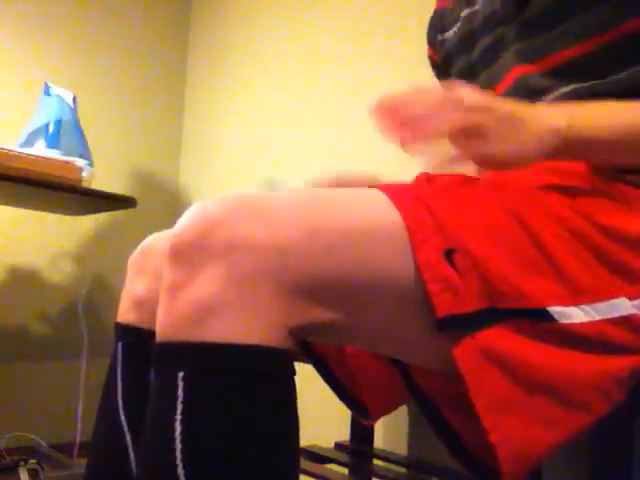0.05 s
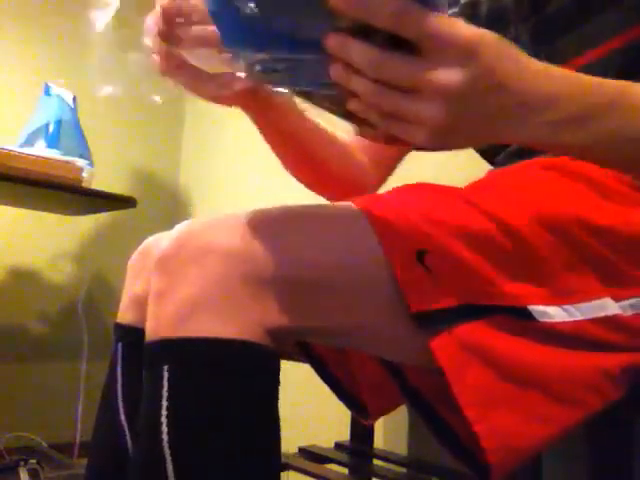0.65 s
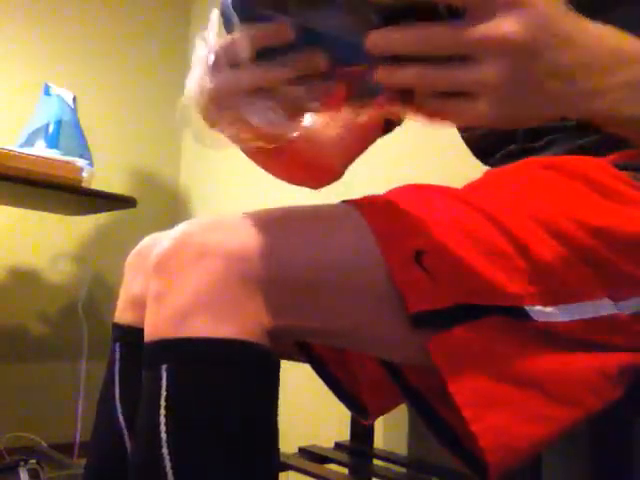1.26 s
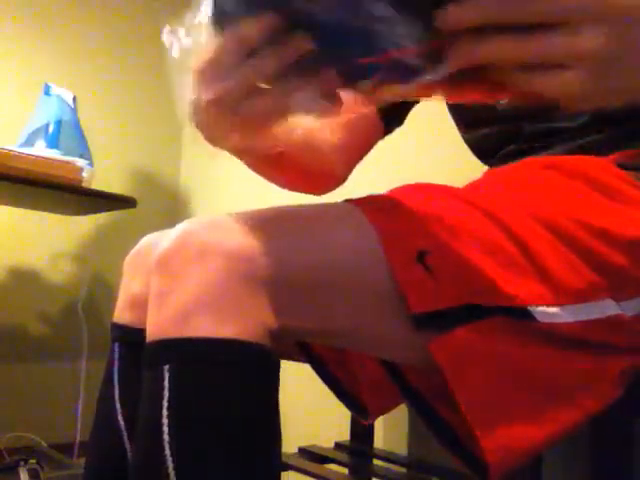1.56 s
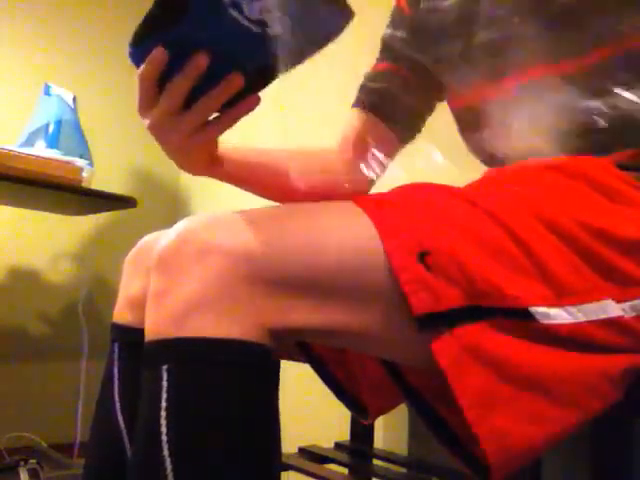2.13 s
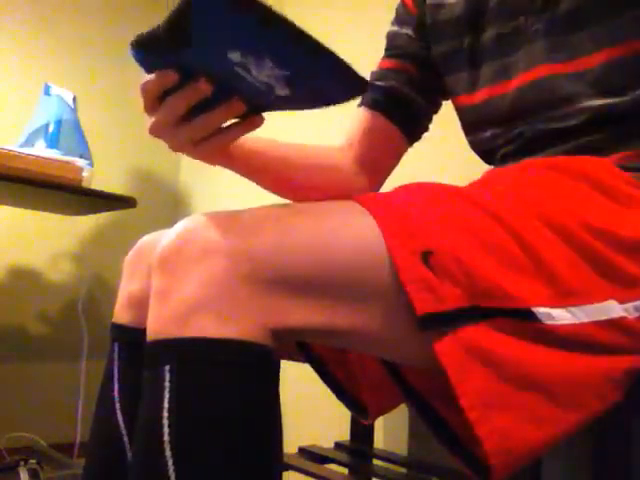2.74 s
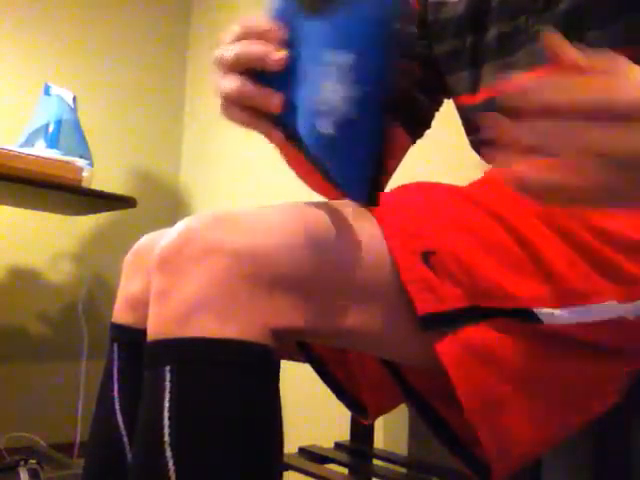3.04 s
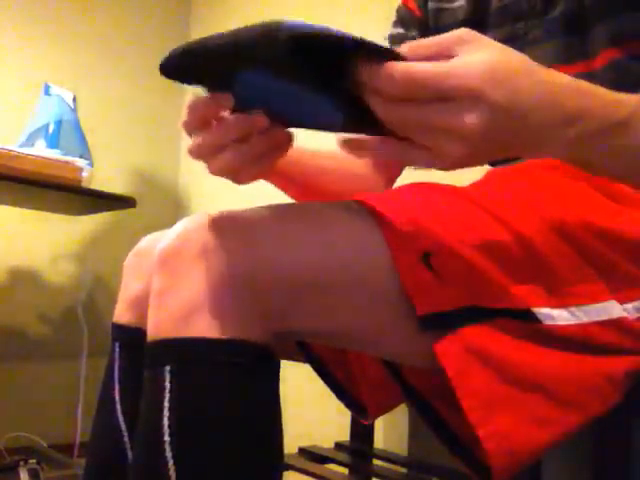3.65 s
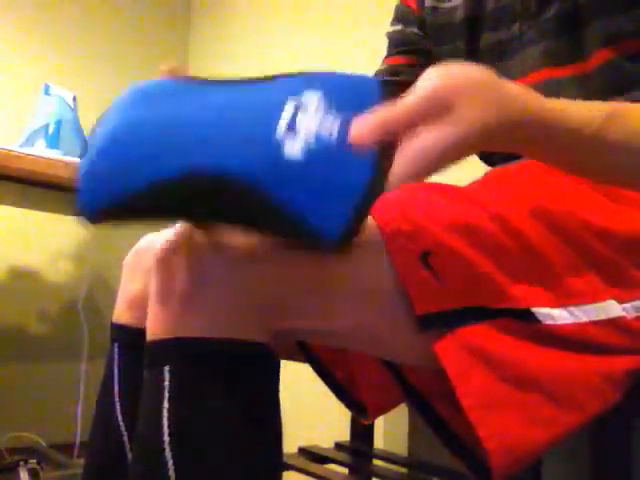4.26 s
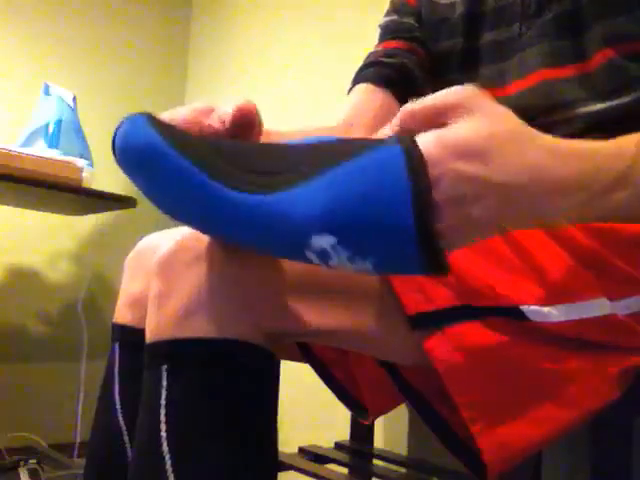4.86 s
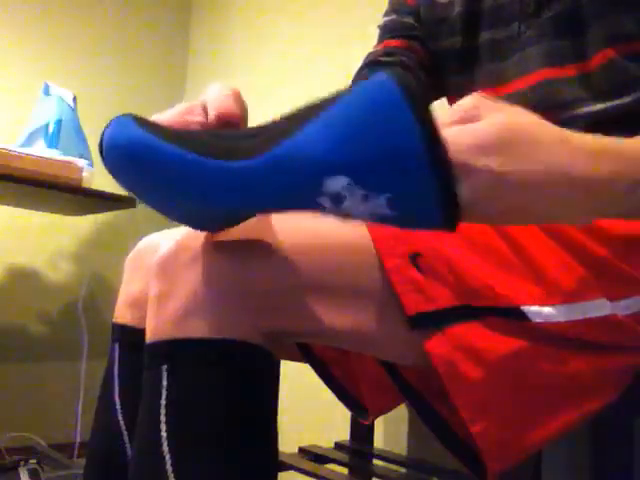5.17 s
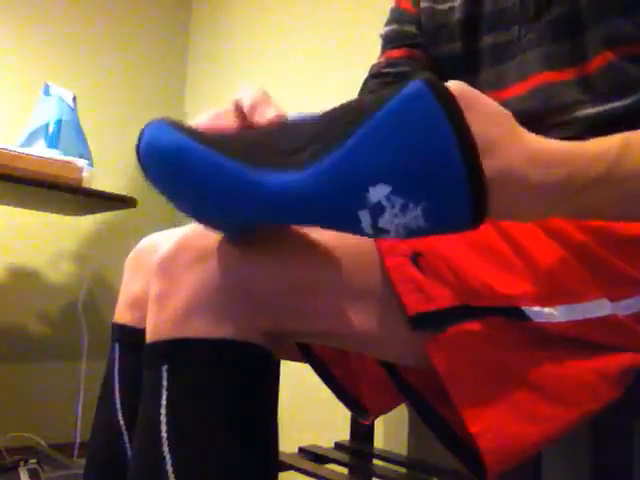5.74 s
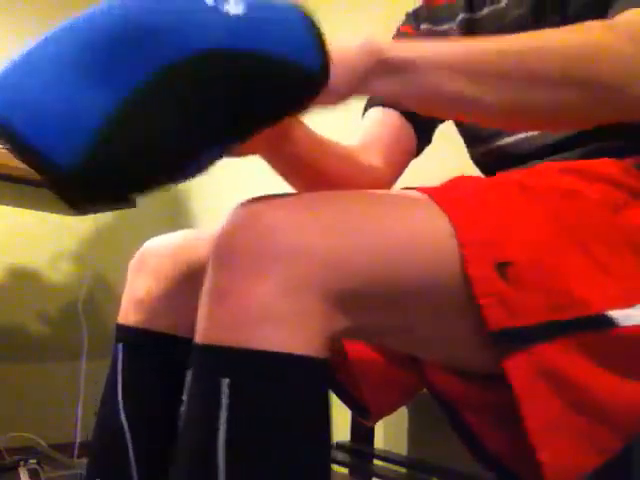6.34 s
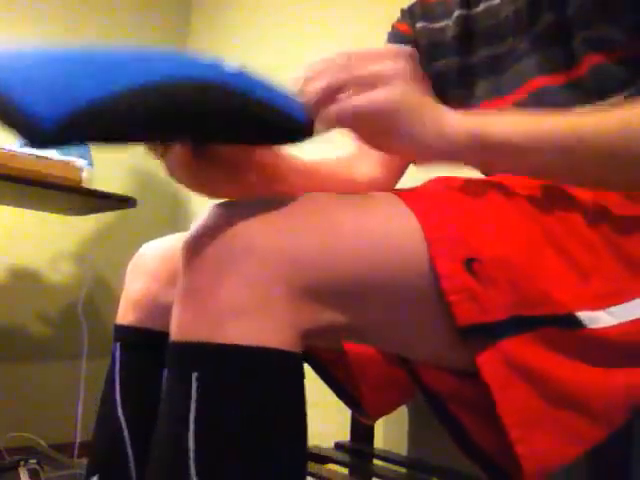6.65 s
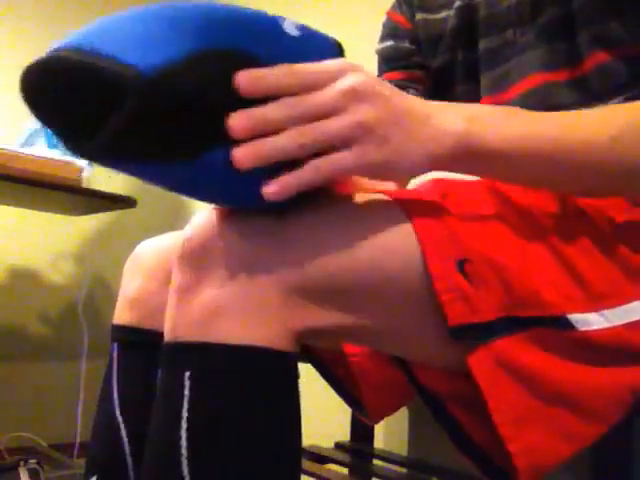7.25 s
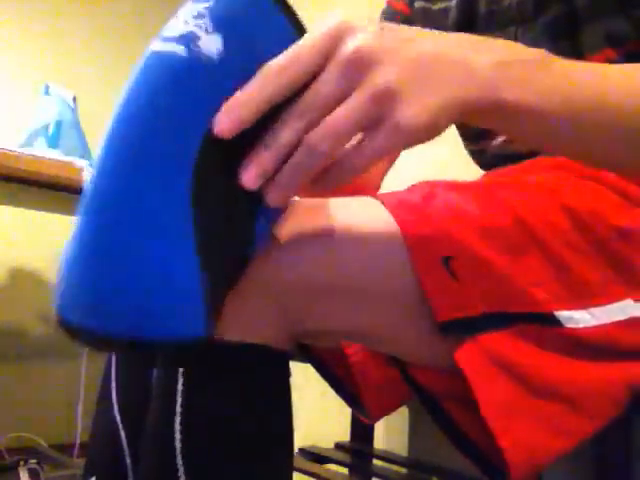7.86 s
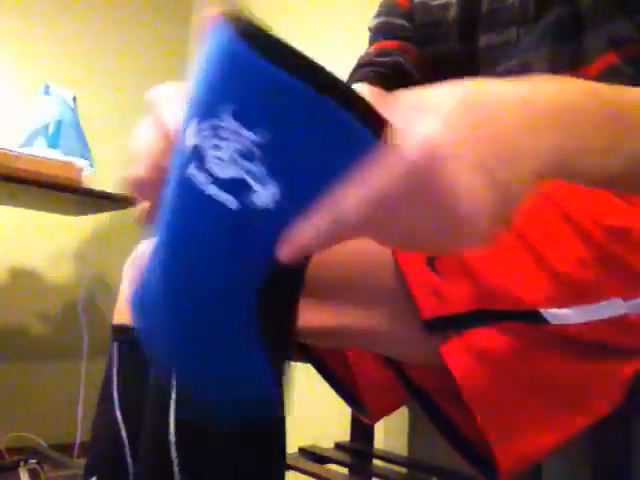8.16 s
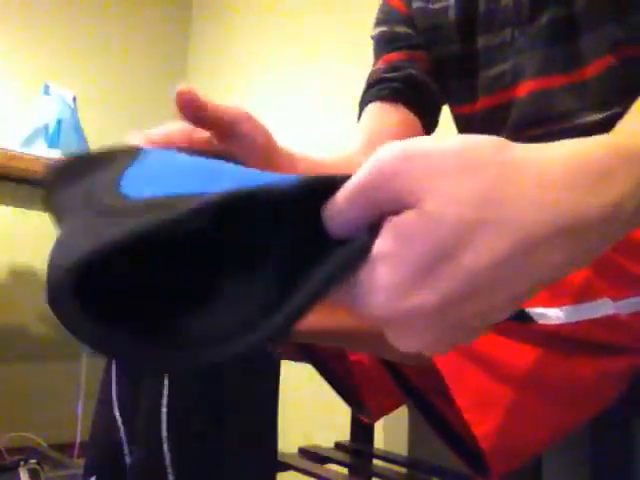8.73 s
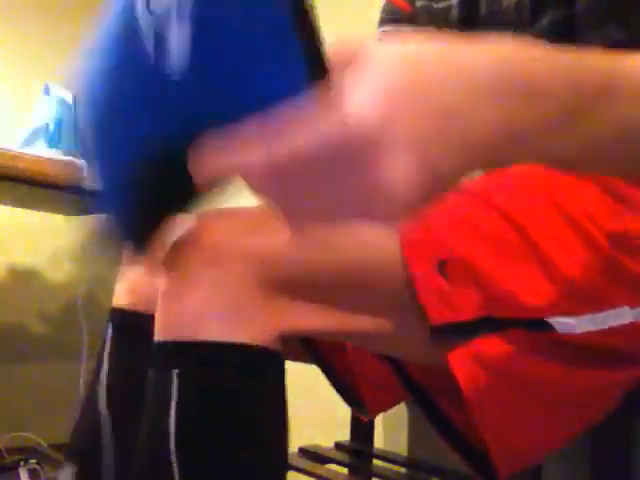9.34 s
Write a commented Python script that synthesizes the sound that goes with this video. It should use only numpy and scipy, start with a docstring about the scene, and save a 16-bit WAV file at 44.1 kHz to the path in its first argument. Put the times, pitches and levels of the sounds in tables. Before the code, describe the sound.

A thin plastic bag crinkles close to the microphone from the start, sliding and crackling in uneven tugs as a foam knee sleeve is drawn out. Creases snap sharply, most strongly between about 0.8 and 1.8 seconds, with brief judders and faint low puffs of air. The crinkling eases after 2 seconds and flares again near 2.7. The bag lands lightly at about 3 seconds and settles by 3.4.

From 3.6 seconds to about 9.6, the sound is much quieter: hands turn the sleeve, its cloth brushing against skin in short, slightly hollow strokes. Fingers pat and bend the soft foam around 4.5 to 4.7 and 5.7 seconds. Fingertips rasp along the hem, mostly around 8.5 seconds, and a nail gives a small bright click at 8.8. The small room adds brief reflections, and a faint steady hiss lies underneath.

```python
"""A small room, close to the microphone: a neoprene knee sleeve is drawn out of a thin plastic bag.
The film slides, crinkles and judders, its creases snap through, and the folding bag puffs air at the
microphone. The bag is tossed aside, lands and settles. Then hands turn the sleeve over: its cloth face
hisses against skin, the hollow tube colours the rubbing, and fingers pat and bend the soft foam, drag
along the hem and flick the seam. Near walls answer briefly, over a faint steady hiss."""
import sys
import numpy as np
from scipy import signal
from scipy.fft import rfft, irfft
from scipy.io import wavfile

SR = 44100
rng = np.random.default_rng(int(sys.argv[2]) if len(sys.argv) > 2 else 0)


def materialize(psi):
    """Save the field psi as 16-bit PCM at rate SR to the path in sys.argv[1].

    A 1-D psi becomes a single channel; in a 2-D psi each row is a channel.
    """
    bounded = np.clip(np.atleast_2d(psi).T, -1, 1)
    quanta = np.round(bounded * 32767).astype(np.int16)
    wavfile.write(sys.argv[1], SR, quanta)


N = 423360
TIME = np.arange(N) / SR

# Levels in the tables are relative; the functions set the balance.
# Tugs and shifts of the bag: peak_s, crinkle_db, rise_s, fall_s, slide_db
BAG_TUGS = [(0.082, -38.5, .11, 0.11, -42), (.28, -45, 0.096, 0.068, -50.5),
            (.385, -46.5, 0.017, 0.1, -54.5), (.49, -39, 0.012, .03, -45),
            (0.557, -34.5, 0.041, 0.085, -41), (.64, -41, 0.016, 0.05, -48),
            (0.789, -47, 0.025, .05, -44.5), (.9, -39.5, 0.076, 0.3, -45), (1.051, -35, 0.075, 0.13, -40),
            (1.189, -36, 0.047, 0.23, -41), (1.402, -33, 0.048, 0.077, -40.5),
            (1.59, -40.5, .02, 0.058, -48), (1.717, -32, 0.085, 0.089, -38), (1.85, -46, 0.06, 0.023, -47),
            (1.99, -50, 0.035, 0.13, -57), (2.089, -43, 0.036, 0.046, -46.5), (2.44, -60, 0.049, 0.16, -63),
            (2.67, -50, 0.04, 0.1, -55), (2.765, -36, 0.033, 0.041, -43.5),
            (2.825, -39.5, 0.015, 0.021, -46.5), (3.09, -43, 0.03, 0.16, -47.5),
            (3.366, -46.5, .02, 0.033, -56)]
# Large creases snapping through: start_s, level_db, body_offset_db, panel_pitch_hz
CREASE_SNAPS = [(0.275, -22.5, -24, 8000), (0.295, -21.5, -24, 5890), (0.363, -19.5, -27, 3930),
                (0.486, -18, -19, 6200), (0.537, -20, -29, 7950), (0.598, -15, -17, 7530),
                (0.756, -23, -23, 2350), (0.772, -6, -20.5, 8970), (0.808, -22, -28, 2180),
                (0.839, -12, -19.5, 7550), (0.962, -13.5, -27, 1510), (1.019, -15, -32, 7400),
                (1.156, -11.5, -20, 6640), (1.201, -13, -32, 5240), (1.239, -6.5, -35, 7660),
                (1.463, -12.5, -18, 8240), (1.525, -15, -16, 10200), (1.571, -18.5, -14, 7200),
                (1.768, -7.5, -24, 5800), (1.839, -16, -29, 4680), (1.952, -20, -21.5, 4550),
                (2.047, -23.5, -19, 2620), (2.108, -20.5, -23, 2400), (2.145, -25.5, -21, 4290),
                (2.184, -25, -23.5, 1800), (2.209, -22.5, -27, 7960), (2.253, -20.5, -17, 1780),
                (2.282, -19.5, -22.5, 4100), (2.339, -28.5, -15, 2240), (2.399, -24, -20.5, 3100),
                (2.406, -22, -16.5, 4430), (2.549, -38.5, -8, 2500), (2.602, -26, -22, 9300),
                (2.639, -26, -29, 6440), (2.669, -20, -28, 7320), (2.689, -20.5, -23, 4000),
                (2.708, -20, -25, 3930), (2.732, -11, -25, 3920), (2.766, -18, -17, 4440),
                (2.845, -21, -24, 5510), (2.87, -24, -17, 9400), (2.923, -20.5, -19.5, 6000),
                (3.125, -21.5, -36, 5720), (3.173, -25.5, -16, 1020), (3.195, -17.5, -20.5, 3260),
                (3.224, -16.5, -21, 8660), (3.297, -25.5, -19, 3760), (3.346, -25, -25.5, 7400)]
# Stretched film juddering, fingertips dragging on the hem: peak_s, level_db, rise_s, fall_s, pitch_hz
FILM_JUDDERS = [(.08, -38.5, .025, 0.033, 870), (.57, -51, .02, 0.027, 2330),
                (1.06, -46, 0.021, 0.045, 1900), (1.69, -39, 0.033, .02, 960),
                (1.725, -34.5, 0.016, 0.047, 1530), (1.76, -39.5, .015, 0.016, 2400),
                (2.086, -38, 0.0067, 0.0081, 2410), (2.395, -48, 0.0043, 0.0092, 1330)]
HEM_DRAGS = [(4.85, -58, 0.023, 0.026, 2000), (6.69, -56, .03, 0.017, 5400),
             (6.748, -59, 0.015, 0.0042, 3900), (7.775, -58, 0.012, .015, 2400),
             (8.528, -49.5, 0.0042, 0.016, 2600), (8.553, -53.5, 0.009, 0.011, 2700),
             (8.57, -51.5, 0.0061, .01, 4200), (8.612, -59, 0.0093, 0.013, 5200),
             (8.632, -53, 0.014, 0.0049, 3900), (8.712, -52.5, 0.015, 0.037, 2600),
             (9.305, -57.5, 0.032, 0.021, 2500), (9.385, -60.5, 0.023, 0.024, 3800)]
# Short contacts and puffs of air: peak_s, level_db, rise_s, fall_s
BAG_LANDING = [(3.035, -26, 0.004, 0.0073), (3.048, -22.5, .004, 0.011), (3.065, -31.5, .0057, 0.017)]
SOFT_KNOCKS = [(3.409, -40, 0.001, 0.0028), (4.531, -49.5, .002, 0.0028), (4.721, -50, 0.0021, 0.0071),
               (5.579, -48, 0.0031, 0.0021), (5.634, -58, 0.0018, 0.0058), (5.709, -44, 0.0012, 0.0023),
               (5.737, -41, .001, .004), (5.748, -44, 0.0028, 0.0058), (5.915, -52, 0.003, 0.0027),
               (7.088, -61, .002, 0.0044), (8.763, -59, 0.0022, 0.0051), (9.505, -64, .003, 0.0089)]
FOAM_BENDS = [(4.33, -69, .03, .05), (4.725, -55.5, 0.03, 0.033), (5.47, -68, .02, 0.033),
              (5.59, -61, 0.016, 0.044), (5.75, -62, 0.028, .025), (8.28, -61.5, 0.039, 0.026),
              (8.86, -63, 0.055, 0.056), (8.93, -64, 0.037, 0.018), (9.47, -64.5, .015, 0.074),
              (9.59, -58.5, 0.018, .03)]
NAIL_FLICKS = [(4.138, -51.5, 0.0012, 0.0027), (5.912, -57.5, .001, 0.0077), (6.257, -77, 0.0022, 0.0074),
               (8.762, -52, .001, .003), (8.7978, -38.5, 0.00045, 0.0017)]
AIR_PUFFS = [(.52, -64, 0.011, 0.029), (.62, -60, 0.024, 0.026), (.96, -64, .01, .02),
             (1.03, -64, 0.012, 0.017), (1.16, -60, .01, .015), (1.26, -69, .01, .015),
             (1.46, -66, .01, .02), (2.78, -58, 0.029, 0.009)]
# A hand stroking the sleeve: middle_s, length_s, hiss_db, hollow_db
HAND_STROKES = [(3.615, 0.022, -57.5, -80), (3.732, 0.06, -56, -78), (3.86, .06, -59.5, -78),
                (4.143, 0.055, -56.5, -77), (4.22, 0.064, -54.5, -63.5), (4.313, 0.064, -59, -66),
                (4.435, 0.16, -59, -65.5), (4.578, .07, -54.5, -60), (4.686, 0.15, -56, -60),
                (4.845, 0.075, -60.5, -69), (4.995, 0.1, -63.5, -70), (5.219, 0.082, -61, -64),
                (5.31, .05, -61, -66), (5.45, .07, -67, -68), (5.568, 0.091, -58.5, -64),
                (5.684, 0.051, -62.5, -72), (5.766, 0.074, -54.5, -58.5), (5.96, 0.12, -61, -69),
                (6.138, .11, -61.5, -65.5), (6.275, 0.03, -53, -61.5), (6.332, 0.052, -61, -62),
                (6.528, 0.072, -61, -56.5), (6.593, 0.14, -56.5, -62.5), (6.697, 0.088, -56, -81),
                (7.056, 0.066, -82, -71), (7.248, 0.1, -61, -63), (7.36, .06, -69, -75),
                (7.518, 0.046, -65.5, -72), (7.611, 0.087, -58, -65.5), (7.765, 0.096, -63, -68),
                (8.115, 0.042, -60.5, -58), (8.185, 0.059, -54.5, -59), (8.292, 0.082, -55.5, -64),
                (8.52, 0.076, -58, -71.5), (8.625, 0.035, -56, -78), (8.718, 0.051, -61, -63),
                (8.886, 0.18, -61, -67), (9.293, 0.11, -61, -68), (9.385, 0.049, -56.5, -76),
                (9.472, 0.056, -57, -68), (9.59, 0.055, -61, -63)]
# Resonances of the air in the sleeve and of the microphone housing: pitch_hz, width_hz, gain_db
TUBE_MODES = [(639, 125, -6.5), (737, 130, -5), (1453, 120, -10.5)]
HOUSING_MODES = [(393, 123, 2), (945, 150, 1), (1447, 51, 0.5), (2180, 93, 0.5), (5720, 620, 1),
                 (7960, 400, -0.5)]
# The spectrum of each sound: frequency_hz, density_db
CRINKLE_SPECTRUM = [(100, -62), (1200, -7.5), (2500, -4.5), (4000, -0.5), (7500, -0.5), (10000, -2.5),
                    (13000, -7), (17000, -10.5)]
SLIDE_SPECTRUM = [(25, -14), (90, -21.5), (170, -4.5), (245, -5.5), (340, 2), (600, 1.5), (1000, 3),
                  (2000, 4.5), (3200, 4), (6000, -9.5), (16000, -44)]
LANDING_SPECTRUM = [(25, -24), (100, -13), (200, -8), (300, -0.5), (520, -5), (850, -7), (1400, -9.5),
                    (2500, -5.5), (4200, -7), (7100, -2.5), (11000, -5), (17000, -12)]
CLOTH_SPECTRUM = [(100, -22), (400, -7), (1200, -7), (2200, -1.5), (3500, -3), (7000, -1), (10000, -4),
                  (13000, -7.5), (17000, -11.5)]
KNOCK_SPECTRUM = [(30, -57), (120, -10), (300, -9), (550, -1), (750, -3), (1100, -10.5), (2000, -15),
                  (5000, -45), (16000, -84)]
BEND_SPECTRUM = [(30, -22), (150, -5), (260, 5), (400, 6), (560, 5.5), (800, -35), (1500, -33),
                 (16000, -42)]
HEM_SPECTRUM = [(100, -18), (350, -12), (620, -3), (860, 6), (1080, -7), (1420, 6.5), (1800, -16),
                (3000, -1.5), (6000, -10), (16000, -26)]
NAIL_SPECTRUM = [(100, -20), (700, -1), (1150, -15), (1700, 1), (2400, -16), (3500, -6), (4350, 2),
                 (5500, -6), (9000, -5), (12000, -20), (17000, -19)]
PUFF_SPECTRUM = [(15, -9), (35, 10), (80, 5), (160, 15), (300, -21), (1000, -45), (16000, -72)]
HISS_SPECTRUM = [(25, 10.5), (55, -19), (80, -14), (120, -2), (250, -2), (400, -6), (900, -9), (1400, -7.5),
                 (2600, -12), (3700, -10.5), (4800, -14), (10000, -16), (17000, -15)]


def bag():
    """Film slides over the sleeve; the harder it is worked, the more small creases buckle, in clusters."""
    crinkling, sliding = tugging()
    effort = crinkling / crinkling.max()
    buckles_per_s = (250 + 1300 * effort) * from_db(4 * drift(120))
    buckles = buckling(grains(buckles_per_s, spread_db=3))
    grip = from_db(0.98 * drift(90))  # the film catches and lets go
    crinkle = colour(from_db(-4) * buckles + from_db(-2.5) * rng.standard_normal(N), CRINKLE_SPECTRUM)
    slide = colour(from_db(-4.5) * buckles + from_db(-0.5) * rng.standard_normal(N), SLIDE_SPECTRUM)
    return grip * (crinkling * crinkle + sliding * slide) + ticks(effort)


def tugging():
    """Gains of crinkling and sliding: each tug swells and relaxes, and overlapping tugs add in power."""
    t = TIME[::40]
    power = sum(np.outer(from_db([crinkle_db, slide_db]), swell(t - peak_s, rise_s, fall_s)) ** 2
                for peak_s, crinkle_db, rise_s, fall_s, slide_db in BAG_TUGS)
    return [np.interp(TIME, t, gain) for gain in np.sqrt(power)]


def buckling(clicks, flutter_s=0.00063, flutter_db=-1):
    """Each buckle is a sharp crack followed by a brief flutter of the sheet."""
    decay = np.exp(-2 / (flutter_s * SR))
    flutter = np.sqrt(signal.lfilter([0, 1 - decay], [1, -decay], clicks ** 2 + 1e-18))
    return rms_one(clicks + from_db(flutter_db) * flutter * rng.standard_normal(N))


def ticks(effort, pitch_count=10):
    """Lone small creases tick, louder as the bag is tugged, each ringing briefly."""
    clicks = grains(per_s=70, spread_db=4) * effort ** 0.9
    pitch_index = rng.integers(0, pitch_count, N)
    rings = sum(resonance(clicks * (pitch_index == k) + 1e-18, hz, width_hz=0.34 * hz, block=N)
                for k, hz in enumerate(np.geomspace(2000, 13000, pitch_count)))
    return from_db(-39.5) * rings


def snaps(yield_s=0.0012, crack_s=0.00038, flutter_s=0.0051, sag_s=0.0058, crack_delay_s=0.001201):
    """Large creases yield and crack; the sheet flutters and the freed panel sags, pitched by its size."""
    size, lead = 1400, 220  # samples: the whole snap, and the part before the crack
    t = TIME[:size] - lead / SR
    onset = np.where(t < 0, from_db(-10) * np.exp(-abs(t) / yield_s), np.exp(-abs(t) / crack_s))
    flutter = (t >= 0) * from_db(-14) * np.exp(-t / flutter_s)
    sag = (t >= 0) * from_db(-9) * np.exp(-t / sag_s)
    click = from_db(8) * (t == 0)
    out = np.zeros(N)
    for start_s, level_db, body_offset_db, panel_hz in CREASE_SNAPS:
        noise = rng.standard_normal(size)
        pop = noise * (onset + flutter) + click
        body = unit_energy(band(noise * (onset + sag), [550, 2400], "band"))
        crease = unit_energy(band(pop, [2400, 7200], "band"))
        edge = unit_energy(band(pop, [7200, 16000], "band"))
        crack = from_db(20.5 + body_offset_db) * body - from_db(2) * crease + from_db(6) * edge
        ringing = crack + peak_lift(crack, panel_hz, q=3, gain_db=7)
        at = int((start_s + crack_delay_s) * SR) - lead
        out[at:at + size] += from_db(level_db) * np.linalg.norm(crack) * unit_energy(ringing)
    return out


def judder():
    """A stretched panel of film judders over the foam."""
    return from_db(-3) * band(rasp(FILM_JUDDERS, width_hz=500), [500, 3500], "band")


def landing():
    """The tossed bag comes down in a quick run of light impacts."""
    return from_db(-0.5) * colour(noise_swells(BAG_LANDING), LANDING_SPECTRUM)


def sleeve():
    """Knit cloth brushes over skin, and the friction sets the air in the soft tube ringing."""
    fibres = grains(per_s=9000, spread_db=-1) * from_db(1.03 * drift(70))
    brushing, rubbing = stroking()
    hiss = brushing * colour(fibres, CLOTH_SPECTRUM)
    friction = rubbing * from_db(1.6 * drift(70))
    squeeze = 1 + 0.046 * drift(8)  # squeezing the tube moves its pitches
    hollow = np.zeros(N)
    for pitch_hz, width_hz, gain_db in TUBE_MODES:
        slips = friction * grains(per_s=5000, spread_db=1.5)
        hollow += from_db(gain_db) * resonance(slips, pitch_hz * squeeze, width_hz)
    return hiss + from_db(1) * band(hollow, [400, 1900], "band")


def stroking(held_from_s=3, waver_db=4, abruptness=2.57):
    """Gains of cloth hiss and hollow rub: strokes speed up and slow down while the held sleeve creeps."""
    t = TIME[::40]
    creep = (t > held_from_s) * from_db(waver_db * np.interp(t, TIME, drift(8.9)))
    power = np.outer(from_db([-71, -78.5]), creep) ** 2  # hiss, hollow
    for middle_s, length_s, hiss_db, hollow_db in HAND_STROKES:
        speed = 1 / np.hypot(1, np.abs(2 * (t - middle_s) / length_s) ** abruptness)
        power += np.outer(from_db([hiss_db, hollow_db]), speed) ** 2
    return [np.interp(TIME, t, gain) for gain in np.sqrt(power)]


def shifting_folds(x, depth_db, per_s):
    """Folds open and close, so different pitches stand out from moment to moment."""
    return x + sum(peak_lift(x, hz, q=5, gain_db=depth_db * drift(per_s))
                   for hz in np.geomspace(600, 12000, 12))


def knocks():
    """Soft knocks: the bag settling at 3.41 s, then fingers patting the foam."""
    return from_db(-1.4) * colour(noise_swells(SOFT_KNOCKS), KNOCK_SPECTRUM)


def foam():
    """The soft foam groans as it is bent."""
    return from_db(-1.5) * colour(noise_swells(FOAM_BENDS), BEND_SPECTRUM)


def hem():
    """Fingertips rasp over the stitches, higher as they move faster, and the open cuff rings along."""
    cuff = colour(noise_swells(HEM_DRAGS), HEM_SPECTRUM)
    stitches = band(rasp(HEM_DRAGS, width_hz=850), 6500, "low")
    return from_db(-5.5) * (cuff + stitches)


def nails():
    """Fingernails flick the seam with small, bright clicks."""
    return colour(noise_swells(NAIL_FLICKS), NAIL_SPECTRUM)


def puffs():
    """The folding bag pushes low puffs of air straight at the microphone."""
    return colour(noise_swells(AIR_PUFFS), PUFF_SPECTRUM)


def room(direct, wet_db=-10.5, wall_cut_hz=8400, t60_s=0.47):
    """Dense reflections from near walls reach the microphone duller than the direct sound."""
    t = TIME[:20000]
    tail = rng.standard_normal(len(t)) * from_db(-60 * t / t60_s) * (t > 0.003)
    reflections = signal.oaconvolve(band(direct, wall_cut_hz, "low"), unit_energy(tail))[:N]
    return direct + from_db(wet_db) * reflections


def background_hiss():
    """A faint steady hiss, fullest in the bass, lies behind everything."""
    return from_db(-64.5) * band(colour(rng.standard_normal(N), HISS_SPECTRUM), 84, "high")


def swell(t, rise_s, fall_s):
    """A contact builds up to its peak at t = 0 and dies away."""
    return np.exp(np.where(t < 0, -(t / rise_s) ** 2, -t / fall_s))


def noise_swells(events):
    """Noise that swells and dies away once for each event."""
    envelope = np.zeros(N)
    for peak_s, level_db, rise_s, fall_s, *_ in events:
        near = slice(int((peak_s - 0.12) * SR), int((peak_s + 0.3) * SR))
        envelope[near] += from_db(level_db) * swell(TIME[near] - peak_s, rise_s, fall_s)
    return envelope * rng.standard_normal(N)


def rasp(rubs, width_hz):
    """Short rubs ring through a resonance that glides from the pitch of one to the next."""
    peak_s, *_, pitch_hz = np.transpose(rubs)
    return resonance(noise_swells(rubs), np.interp(TIME, peak_s, pitch_hz), width_hz)


def grains(per_s, spread_db):
    """Tiny slips at random moments, uneven in size; rms 1."""
    sizes = from_db(spread_db * np.minimum(rng.exponential(1, N), 4))
    return rms_one(sizes * rng.choice([-1, 1], N) * (rng.random(N) < per_s / SR))


def drift(per_s):
    """A random wander with about per_s turns a second; rms 1."""
    knots = rng.standard_normal(N // 40)
    return rms_one(np.interp(TIME * per_s, np.arange(len(knots)), knots))


def resonance(x, centre_hz, width_hz, block=512):
    """A resonance whose centre may move; white noise keeps its power."""
    radius = np.exp(-np.pi * width_hz / SR)
    angle = np.broadcast_to(2 * np.pi * centre_hz / SR, N)
    out, state = np.zeros(N), np.zeros(2)
    for i in range(0, N, block):
        feedback = [1, -2 * radius * np.cos(angle[i]), radius ** 2]
        out[i:i + block], state = signal.lfilter([1, 0, -1], feedback, x[i:i + block], zi=state)
    return out * np.sqrt((1 - radius ** 2) / 2)


def colour(x, spectrum, size=4096):
    """Minimum-phase filter with the given spectrum; white noise keeps its power."""
    hz, db = np.transpose(spectrum)
    bins_hz = np.arange(size // 2 + 1) * SR / size
    gain = rms_one(from_db(np.interp(np.log(bins_hz + 1), np.log(hz), db)))
    cepstrum = irfft(np.log(gain))[:size // 2]
    cepstrum[1:] *= 2
    impulse = irfft(np.exp(rfft(cepstrum, size)))
    return signal.oaconvolve(x, impulse)[:N]


def peak_lift(x, hz, q, gain_db):
    """The band that, added to x, changes its level at hz by gain_db."""
    return (from_db(gain_db) - 1) * signal.lfilter(*signal.iirpeak(hz, q, fs=SR), x)


def band(x, edges_hz, kind):
    """Second-order Butterworth filter."""
    return signal.sosfilt(signal.butter(2, edges_hz, kind, fs=SR, output="sos"), x + 1e-18)


def from_db(db):
    """Decibels to gain."""
    return 10 ** (np.asarray(db) / 20)


def rms_one(x):
    """Scale to rms 1."""
    return x / np.sqrt(np.mean(x ** 2) + 1e-20)


def unit_energy(x):
    """Scale to energy 1."""
    return x / np.linalg.norm(x)


def scene():
    """Bag, sleeve and hands close to one microphone in the small room."""
    plastic = judder() + from_db(-0.28) * shifting_folds(bag(), depth_db=1.16, per_s=60)
    plastic += from_db(-2.5) * snaps() + landing()
    rubbing = from_db(-1.46) * shifting_folds(sleeve(), depth_db=1.8, per_s=25)
    handling = rubbing + knocks() + foam() + hem() + nails()
    return (puffs() + background_hiss() + room(plastic + handling))[None]


def record(dry, cutoff_hz=17200):
    """The microphone housing adds its resonances; the top is cut steeply."""
    for pitch_hz, width_hz, gain_db in HOUSING_MODES:
        dry = dry + peak_lift(dry, pitch_hz, pitch_hz / width_hz, gain_db)
    return signal.sosfilt(signal.ellip(10, 0.1, 70, cutoff_hz, fs=SR, output="sos"), dry)


dry = scene()
out = record(dry)
materialize(out)
```